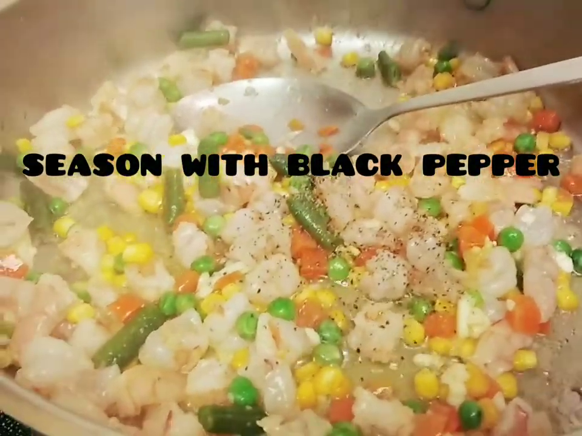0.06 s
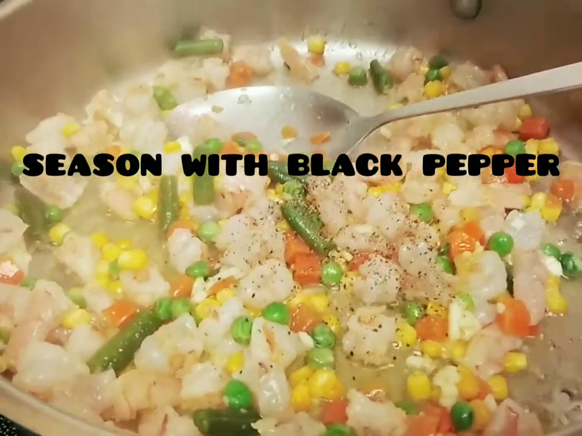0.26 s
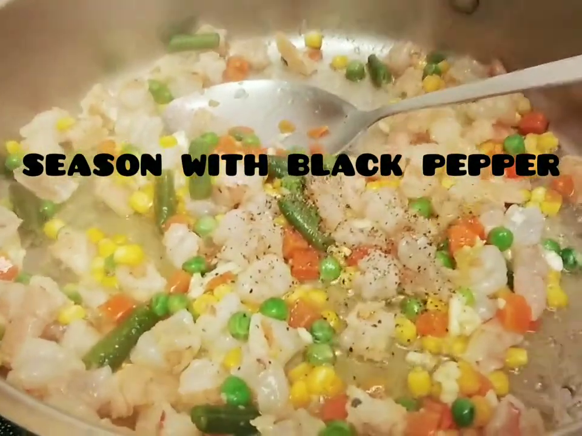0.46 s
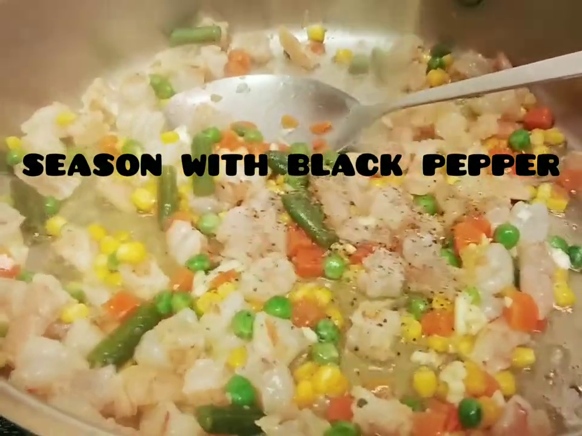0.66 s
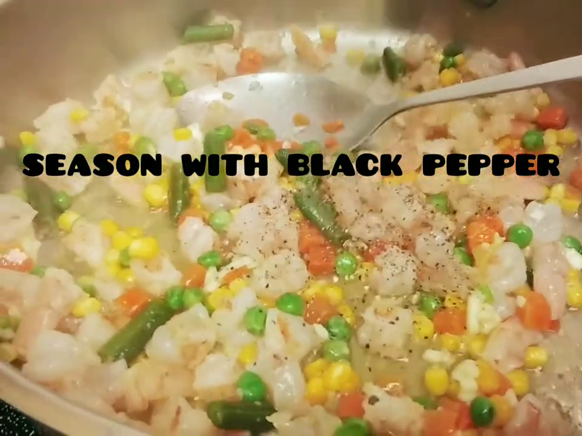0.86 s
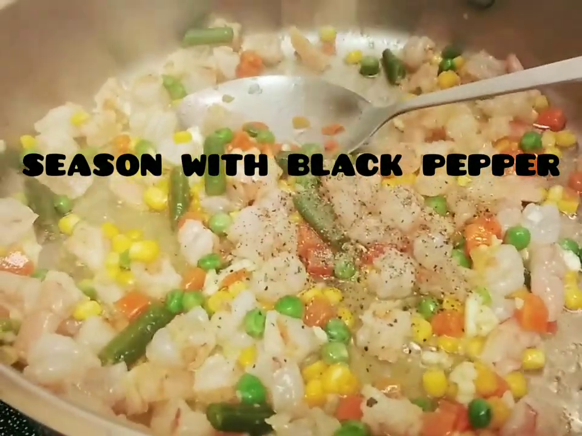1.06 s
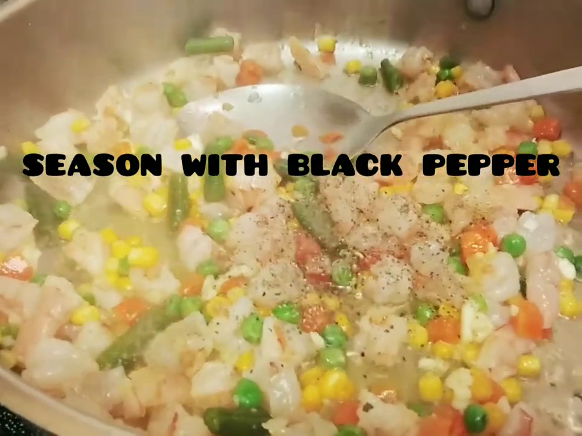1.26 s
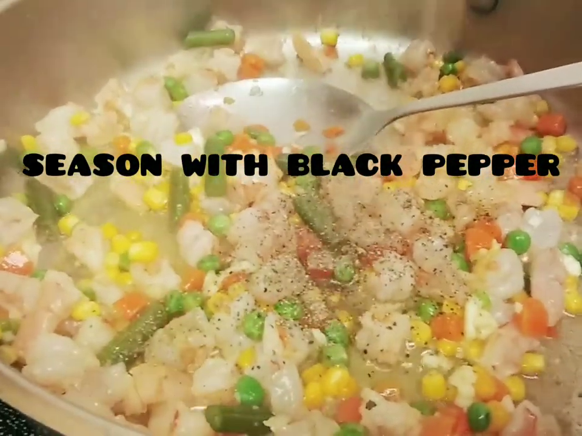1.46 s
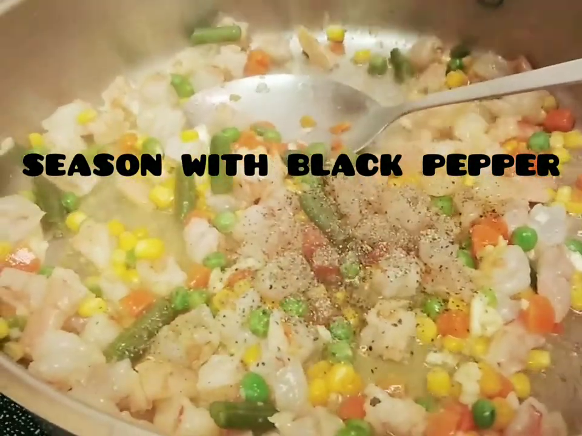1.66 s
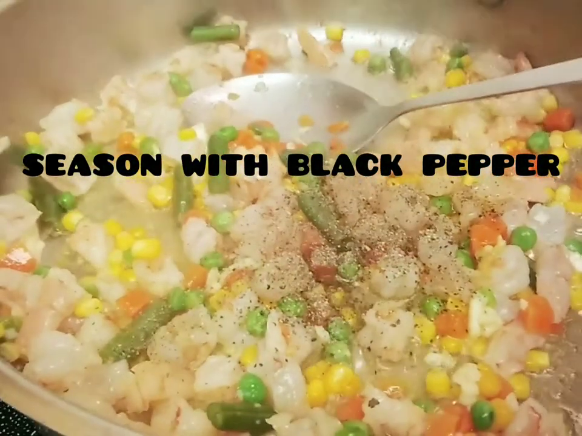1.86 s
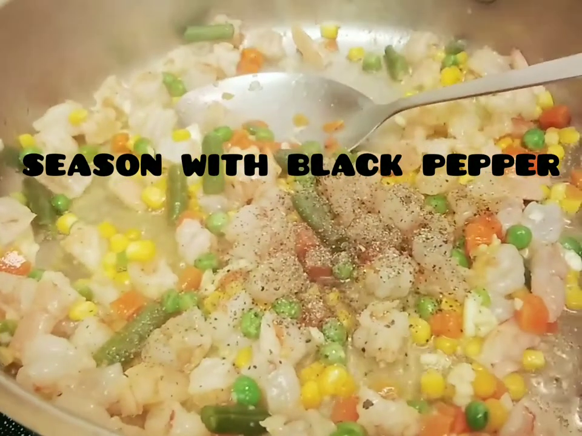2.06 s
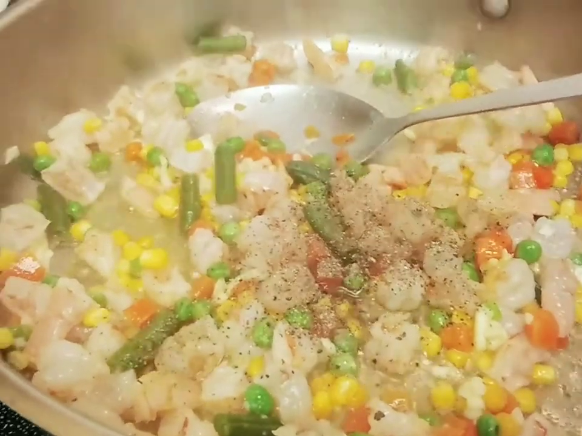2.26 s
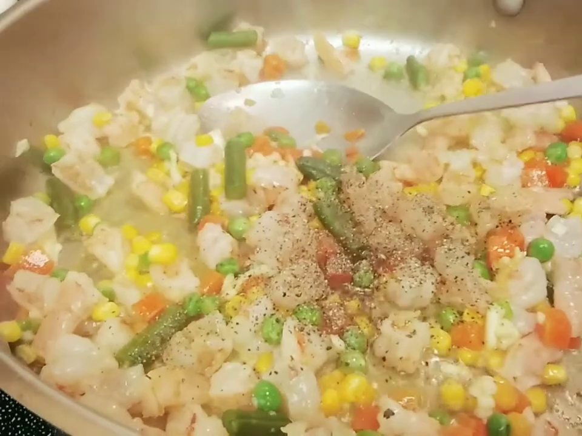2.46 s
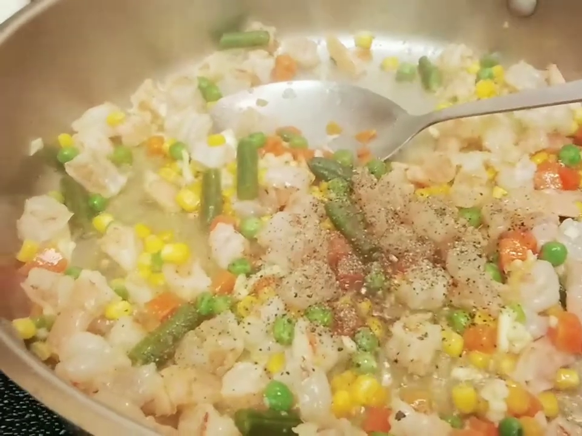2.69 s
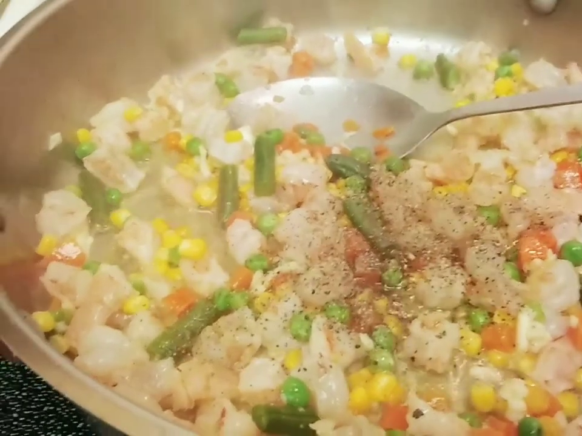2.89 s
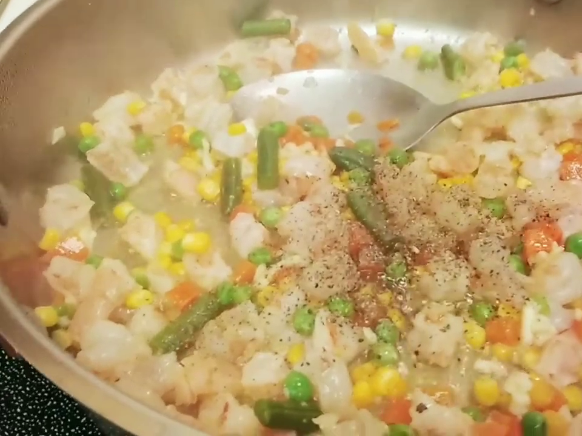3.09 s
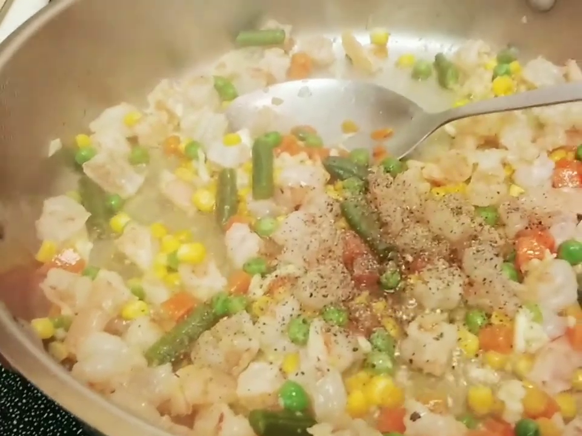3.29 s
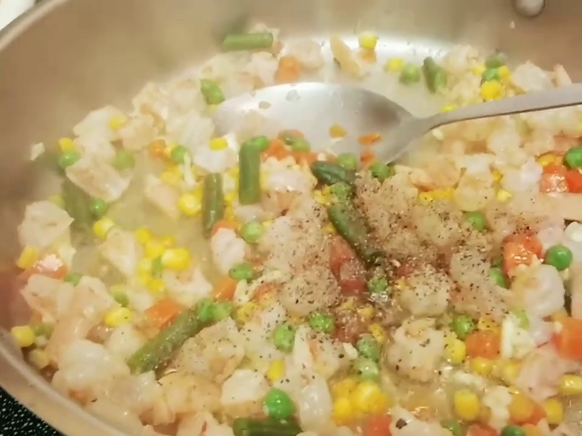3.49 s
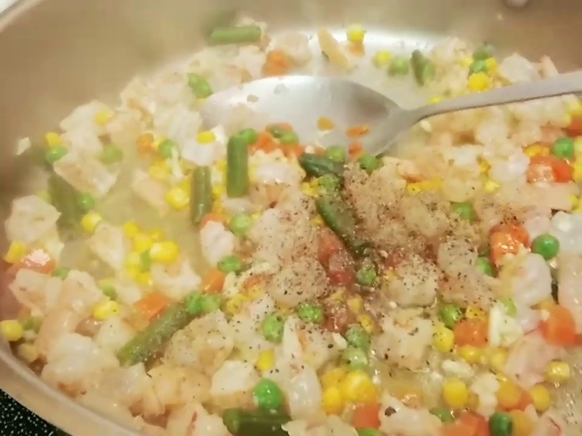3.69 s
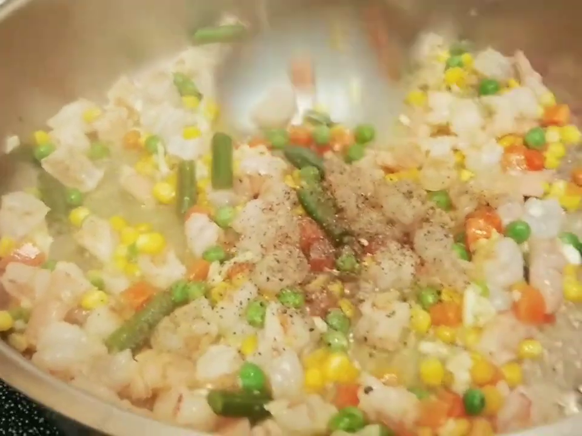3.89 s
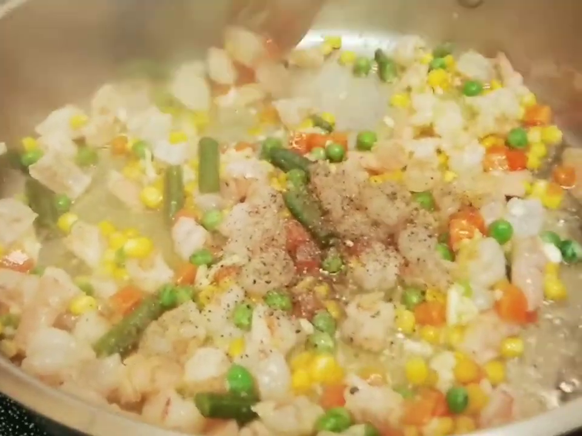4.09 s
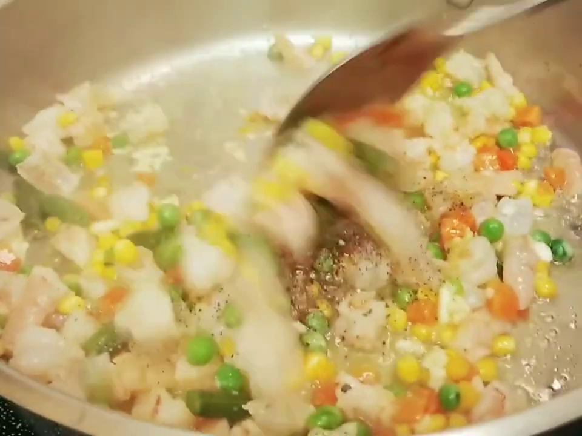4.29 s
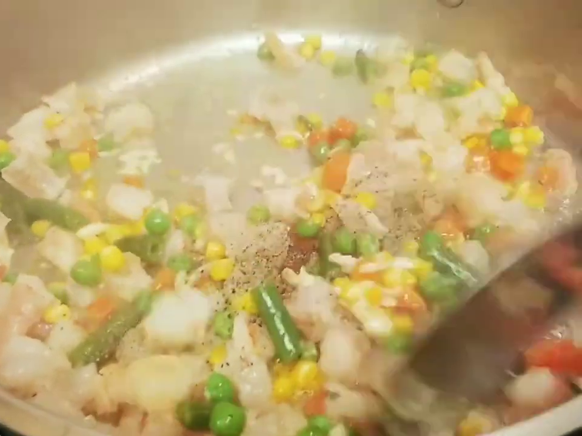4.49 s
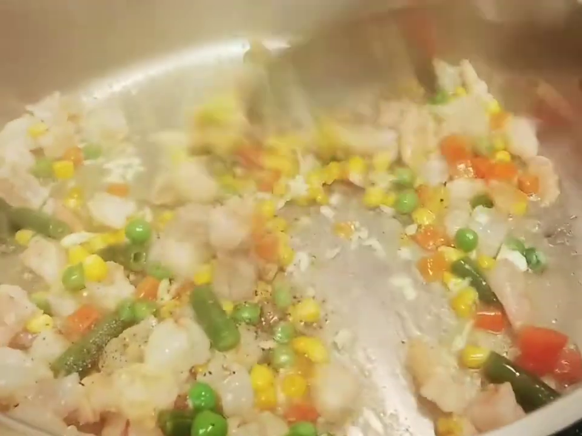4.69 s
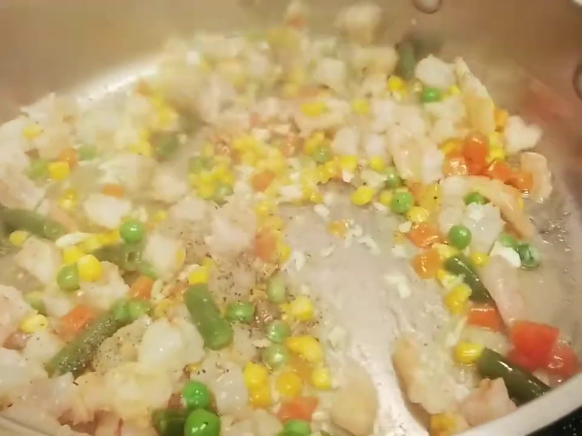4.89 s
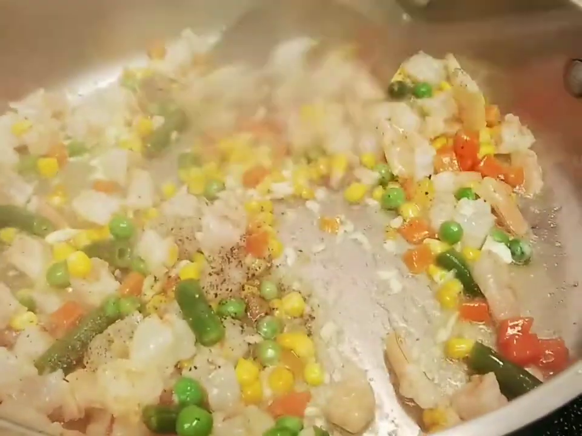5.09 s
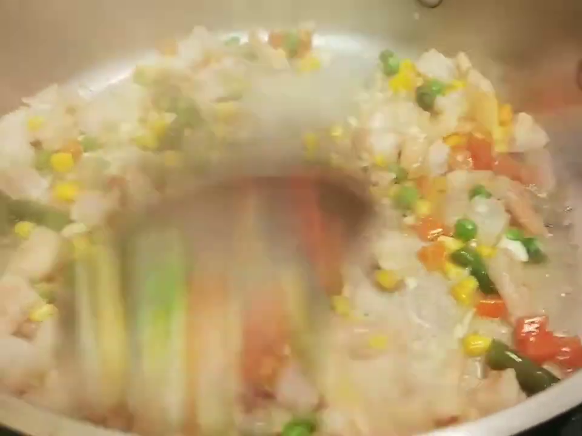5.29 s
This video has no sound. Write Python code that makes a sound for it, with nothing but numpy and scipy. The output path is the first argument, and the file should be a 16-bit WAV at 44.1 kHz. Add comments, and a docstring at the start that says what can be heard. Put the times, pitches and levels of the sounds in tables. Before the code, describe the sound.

A close, steady, bright sizzle runs throughout as shrimp and vegetables fry in oil in a steel pan in a kitchen. Tiny pops and faint spurts of steam dot the hiss, with sharp spits of oil at about 1.7 and 3.4 seconds. Between 2.7 and 2.9 seconds, something is set down on the worktop with a few dull thuds. At 3.7 seconds a metal spoon is picked up, clinking lightly and sliding over the steel with a thin, high rasp. At 4.2 seconds it skids into the pan with a sharp, briefly ringing clang, the loudest sound. Two lower metallic knocks on the pan's bottom follow at about 4.6 and 4.7 seconds. The spoon scrapes on through softly squelching food while the sizzle grows slightly and flares, with a short spurt of steam at around 5.2 seconds.

```python
"""A close, steady sizzle: shrimp and vegetables fry in oil in a steel pan in a kitchen. Tiny steam
bubbles burst by the thousand, coloured by the air between the pan's walls. Something is set down on the
worktop with a few dull thuds. Then a metal spoon is picked up, clangs against the pan and knocks on its
bottom, exciting the steel's modes, and scrapes through the wet food while the sizzle grows."""
import sys
import numpy as np
from scipy import signal
from scipy.fft import rfft, irfft, next_fast_len
from scipy.io import wavfile
from scipy.ndimage import map_coordinates

SR = 44100
rng = np.random.default_rng(int(sys.argv[2]) if len(sys.argv) > 2 else 0)


def master_out(mix):
    """Clip the mix to full scale and print it as 16-bit PCM to the path in sys.argv[1]."""
    frames = np.transpose(np.atleast_2d(mix))
    ceiling = np.clip(frames, -1, 1)
    pcm = np.round(ceiling * 32767).astype(np.int16)
    wavfile.write(sys.argv[1], SR, pcm)


N = 235701
TIME = np.arange(N) / SR
CUTOFF_HZ = 15850


def from_db(db):
    """Decibels to amplitude ratio."""
    return 10 ** (np.asarray(db) / 20)

def rms_one(x):
    """Normalisation to unit rms."""
    return x / np.sqrt(np.mean(x ** 2) + 1e-20)

def add(track, start_s, sound):
    """Superposition: a sound adds to the track from its start on."""
    at = max(0, round(start_s * SR))
    track[at:at + len(sound)] += sound[:N - at]

def filtered(x, gain_at):
    """Linear filtering: the spectrum is multiplied by gain_at(Hz)."""
    size = next_fast_len(len(x))
    hz = np.maximum(np.fft.rfftfreq(size, 1 / SR), 1)
    return irfft(rfft(x, size) * gain_at(hz), size)[:len(x)]

def spectrum(points):
    """Spectral envelope through (Hz, dB) points, interpolated in log frequency."""
    at, db = np.transpose(points)
    return lambda hz: from_db(np.interp(np.log(hz), np.log(at), db))

def band(low_hz, high_hz, low_order, high_order):
    """Band-pass response: each skirt falls 6 dB per octave per order."""
    return lambda hz: ((1 + (low_hz / hz) ** (2 * low_order))
                       * (1 + (hz / high_hz) ** (2 * high_order))) ** -.5

def resonances(modes, width_hz, valley_db):
    """Modal response: one peak per mode, wider in the treble, summed in power over a flat floor."""
    grid = np.arange(0, SR / 2, 10)
    power = sum(from_db(db) ** 2 / (1 + ((grid - hz) / (width_hz + 0.003 * hz)) ** 2) ** 2
                for hz, db, *_ in modes)
    return lambda hz: np.interp(hz, grid, np.sqrt(power + from_db(valley_db) ** 2))

def drift(rate_hz):
    """Random modulation: low-passed noise of unit rms."""
    return rms_one(filtered(rng.standard_normal(N), lambda hz: 1 / (1 + (hz / rate_hz) ** 2)))

def grains(per_s, spread_db):
    """Shot noise: independent impulses of random size and sign."""
    sizes = from_db(spread_db * np.minimum(rng.exponential(1, N), 6)) * rng.choice([-1, 1], N)
    return sizes * (rng.random(N) < per_s / SR)


# Spectrum of the stove and kitchen. Each row: frequency in Hz, relative density in dB.
ROOM_SPECTRUM = [(20, -29), (40, -23), (60, 14), (85, -3), (120, 11), (180, -32), (400, -11), (900, -25)]
def rumble(level_db, waver_db):
    """Ambient noise: a faint low floor whose level wavers."""
    level = from_db(level_db + waver_db * drift(rate_hz=2.3))
    return level * rms_one(filtered(rng.standard_normal(N), spectrum(ROOM_SPECTRUM)))

# Path of a faint band in the sizzle. Each row: time in seconds, centre in Hz, level in dB.
GLIDE_PATH = [(1.9, 2487, -100), (2.17, 2640, -56), (2.45, 3026, -59.5), (2.72, 3690, -63),
              (2.98, 3340, -69), (3.11, 2660, -61), (3.35, 2285, -83)]
def gliding_band(width_hz):
    """Narrow-band noise: a randomly modulated carrier glides up in pitch and back down."""
    times, centres, levels = np.transpose(GLIDE_PATH)
    phase = 2 * np.pi * np.cumsum(np.interp(TIME, times, centres)) / SR
    level = from_db(np.interp(TIME, times, levels))
    return level * (drift(width_hz) * np.cos(phase) + drift(width_hz) * np.sin(phase))

# Modes of the air between the pan's high walls. Each row: frequency in Hz, relative level in dB.
AIR_MODES = [(590, -5), (1130, 3), (1500, 4), (1630, 2), (1950, 3.5), (2320, 3), (2720, -1), (2950, -1),
             (3300, 1.5), (3600, 0.5)]
def simmer(level_db, patchy_db):
    """Cavity resonance: juice bubbles in patches that come and go, each exciting one air mode."""
    patches = np.zeros(N)
    for mode in AIR_MODES:
        bubbles = grains(per_s=800, spread_db=4.5)
        patch = filtered(bubbles, resonances([mode], width_hz=53, valley_db=-41))
        patches += patch * from_db(patchy_db * drift(rate_hz=2.7))
    return from_db(level_db) * rms_one(patches)

# Spectrum of bursting bubbles. Each row: frequency in Hz, relative density in dB.
BUBBLE_SPECTRUM = [(150, -19), (400, -10.5), (900, -13), (1500, -14), (2500, -10), (3600, -6.5),
                   (4700, -5.5), (5400, -2.5), (7000, 0.5), (8500, 3), (10200, -2.5), (12500, -8.5),
                   (15800, -11)]
def sizzle(level_db, flutter_db, stir_s, growth_db_per_s):
    """Shot noise of bursting steam bubbles; it grows once stirring brings wet food onto hot steel."""
    bursts = grains(per_s=14000, spread_db=2.0) * from_db(flutter_db * drift(rate_hz=12.0))
    cavity = resonances(AIR_MODES, width_hz=72, valley_db=-1.0)
    hiss = filtered(bursts, lambda hz: spectrum(BUBBLE_SPECTRUM)(hz) * cavity(hz))
    return rms_one(hiss) * from_db(level_db + growth_db_per_s * np.maximum(TIME - stir_s, 0))

def crackle(level_db, spread_db, ring_s):
    """Damped resonance: larger bubbles pop out of the hiss, each size at its own pitch."""
    out, t = np.zeros(N), TIME[:SR // 50]
    for hz in np.geomspace(2200, 11000, 7):
        pop = filtered(rng.standard_normal(len(t)), band(hz / 1.25, hz * 1.25, 4, 4))
        pop *= np.exp(-t / ring_s)
        pops = signal.fftconvolve(grains(per_s=14, spread_db=spread_db), pop / np.linalg.norm(pop))
        out += pops[:N] * spectrum(BUBBLE_SPECTRUM)(hz) ** .5
    return from_db(level_db) * rms_one(out)

# Strokes that lay wet food on bare hot steel. Each row: start in seconds, level in dB.
WETTINGS = [(3.76, -46), (4.3, -47), (4.6, -48), (5.08, -43.5)]
def flares(low_hz, high_hz, rise_s, fade_db_per_s):
    """Flash boiling: fresh moisture fizzes in very fine bubbles, then dries off."""
    power = np.zeros(N)
    for start, db in WETTINGS:
        age = np.maximum(TIME - start, 0)
        power += (np.minimum(age / rise_s, 1) * from_db(db - fade_db_per_s * age)) ** 2
    fizz = filtered(grains(per_s=7400, spread_db=2.5), band(low_hz, high_hz, 2.7, 3.1))
    return np.sqrt(power) * rms_one(fizz)

# Sharp ticks. Each row: start in seconds, peak in dB, lower corner in Hz, 60 dB decay time in seconds.
SHARP_TICKS = [(1.742, -25, 1370, 0.017), (1.742, -30, 11000, .05), (1.748, -33, 1960, 0.14),
               (3.382, -23, 5900, 0.016), (3.856, -22, 4500, 0.0081), (4.614, -25.5, 8000, 0.077)]
def ticks():
    """Impulsive sources: spits of oil and, at 4.614 s, the bright click of the spoon hitting the pan."""
    out, t = np.zeros(N), TIME[:SR // 20]
    for start, db, low_hz, t60 in SHARP_TICKS:
        tick = filtered(rng.standard_normal(len(t)), band(low_hz, 11700, 5.3, 4.7))
        tick *= from_db(-60 * t / t60)
        add(out, start, from_db(db) * tick / np.abs(tick).max())
    return out

# Modes of the steel pan with food in it. Each row: frequency in Hz, relative level in dB,
# 60 dB decay time in seconds.
STEEL_MODES = [(114, -1, .24), (255, -5, .1), (310, 2, .14), (436, -1, .15), (505, -5, .12),
               (579, -1.5, .15), (775, -1.5, .12), (921, -1, .22), (1105, -5, .13), (1185, -5, .2),
               (1300, -6, .12), (1410, -2, .2), (1465, -3, .15), (1520, -1, .13), (1955, -5, .11),
               (2235, -5, .15), (2422, -5, .14), (2505, -5, .13), (2568, -3, .09), (2725, -6, .17),
               (3170, -6, .12), (3555, -4, .17), (3635, 3, .07), (3978, 1, .16), (4365, -4, .11),
               (4750, -3, .12), (5136, -3, .08), (5600, -4, .14), (6350, -4, .12), (6790, -2, .22),
               (7106, -1, .2), (7300, -2, .22), (8130, -2, .13), (8480, 2, .17), (9710, 1, .17),
               (10080, -1, .16), (10950, -1, .13), (11476, 1, .11), (13920, -3, .2), (15040, -4, .2)]
def pan_rush(rows, octaves, swell_share, low_order, high_order, fade_db, grit_db, glide_octaves=0):
    """Forced vibration: a rush of tiny bursts or slips drives the pan, swelling and then fading."""
    out, t = np.zeros(N), TIME[:SR // 2]
    impulses = grains(per_s=5400, spread_db=1.0)
    steel = resonances([mode for mode in STEEL_MODES if mode[0] < 8000], width_hz=6.2, valley_db=-1)
    edge_ratio = 2 ** (octaves / 2)
    roughness = rms_one(from_db(grit_db * drift(rate_hz=80)))
    for start, length, db, centre_hz in rows:
        force = np.roll(impulses, rng.integers(N))[:len(t)]
        passband = band(centre_hz / edge_ratio, centre_hz * edge_ratio, low_order, high_order)
        rush = rms_one(filtered(force, lambda hz: passband(hz) * steel(hz)))
        progress = t / length
        speed = 2 ** (glide_octaves * (np.minimum(progress, 1) - swell_share))
        rush = map_coordinates(rush, [np.cumsum(speed)], order=5, mode="mirror")  # pitch follows speed
        swell = np.minimum(progress / swell_share, 1)
        fade = from_db(fade_db * np.maximum(progress - swell_share, 0) ** 1.86)
        add(out, start, from_db(db) * swell * fade * rush)
    return out * roughness

# Spurts of steam. Each row: start and length in seconds, level in dB, band centre in Hz.
STEAM_SPURTS = [(.39, 0.083, -52, 1970), (.42, 0.08, -46, 5570), (.603, 0.085, -42, 5360),
                (.612, 0.062, -45, 6930), (1.43, 0.1, -46.5, 5700), (1.746, 0.039, -46, 2350),
                (3.185, 0.045, -53.5, 2050), (5.21, 0.15, -31.5, 8300)]
def steam():
    """Flow noise: steam escapes from under the food in a narrow band that rises in pitch."""
    return pan_rush(STEAM_SPURTS, octaves=0.19, swell_share=0.22, low_order=14, high_order=20,
                    fade_db=-47, grit_db=3.5, glide_octaves=.2)

# Pushes through the food. Each row: start and length in seconds, level in dB, band centre in Hz.
FOOD_PUSHES = [(3.8, 0.3, -44, 1500), (4.36, 0.19, -47, 2700), (4.63, 0.27, -36, 2120),
               (5.01, 0.32, -42.5, 2480), (5.068, 0.087, -48.5, 643)]
def squelches():
    """Broadband shot noise: wet food squelches as it is pushed through the pan."""
    return pan_rush(FOOD_PUSHES, octaves=2.44, swell_share=0.088, low_order=4.1, high_order=1.8,
                    fade_db=-37, grit_db=1)

# Slides of the spoon. Each row: start and length in seconds, level in dB, band centre in Hz.
SPOON_SLIDES = [(3.719, 0.27, -35.5, 6900), (3.785, 0.17, -30.5, 6950), (3.98, 0.16, -41, 6670),
                (4.245, 0.16, -28, 7000), (4.275, 0.15, -34, 5820), (4.61, 0.2, -27.5, 7130),
                (5.012, 0.21, -42.5, 5400), (5.19, 0.23, -41, 6900)]
def slides():
    """Stick-slip friction: the spoon slides over the steel with a thin, high rasp."""
    return pan_rush(SPOON_SLIDES, octaves=0.27, swell_share=0.021, low_order=7.3, high_order=110,
                    fade_db=-46.0, grit_db=1.3)

# Catches of the spoon's edge. Each row: start and length in seconds, level in dB, band centre in Hz.
EDGE_CATCHES = [(3.8068, 0.011, -31, 5500), (3.8185, .016, -34, 7500), (3.8445, 0.011, -36, 6500),
                (3.860, .04, -36, 3800), (3.8748, 0.02, -30, 5750), (3.890, 0.071, -37, 5760),
                (4.294, .02, -28, 5800)]
def catches():
    """Stick-slip in brief bursts: the edge catches and jumps on the steel."""
    return pan_rush(EDGE_CATCHES, octaves=0.2, swell_share=0.037, low_order=15, high_order=5,
                    fade_db=-51, grit_db=1.0)

# The spoon's skid. Each row: start and length in seconds, level in dB, band centre in Hz.
SPOON_SKID = [(4.205, 0.19, -20.5, 1700)]
def skid():
    """Broadband friction noise: the spoon skids into the loud clang and on along the steel."""
    return pan_rush(SPOON_SKID, octaves=9.1, swell_share=0.085, low_order=5.6, high_order=0.27,
                    fade_db=-61, grit_db=0.0)

def struck_at(modes, favoured_hz, boost_db=9):
    """Mode shapes: a blow favours the modes that swing most at the spot struck."""
    excited = np.array(modes, float)
    for hz in favoured_hz:
        excited[np.argmin(np.abs(excited[:, 0] - hz)), 1] += boost_db
    return excited

def impacts(rows, modes, rise_cycles, low_order, width_hz, valley_db,
            tail_db, tail_t60, boom_db, boom_t60):
    """Impulse response: a crack, a dense crash, clear modes and the room's tail, longest in the bass."""
    out, t = np.zeros(N), TIME[:SR * 3 // 4]
    shortest_rise_s, crack_s = 0.00096, 0.005
    bass = band(50, 132, 3.6, 3.8)
    for start, db, low_hz, high_hz, high_order, t60, crack_db, ring_db, favoured_hz in rows:
        excited = struck_at(modes, favoured_hz)
        mode_hz, mode_db, mode_t60 = excited.T[:, :, None]
        body = resonances(excited, width_hz, valley_db)
        contact = band(low_hz, high_hz, low_order, high_order)
        dense, room, boom = (filtered(rng.standard_normal(len(t)), lambda hz: contact(hz) * colour(hz))
                             for colour in (body, body, bass))
        crack = from_db(crack_db) * np.exp(-(t / crack_s) ** 2)
        crash = dense * (crack + from_db(-60 * t / t60))
        crash += room * from_db(tail_db - 60 * t / tail_t60)
        crash += boom * from_db(boom_db - 60 * t / boom_t60)
        strength = contact(mode_hz) * from_db(mode_db + rng.normal(0, 2.0, mode_hz.shape))
        waves = np.sin(2 * np.pi * (mode_hz * t + rng.random(mode_hz.shape)))
        ring = np.sum(strength * waves * from_db(-60 * t / mode_t60), axis=0)
        rise_s = shortest_rise_s + rise_cycles / high_hz  # a cushioned contact is duller and slower
        blow = (rms_one(crash) + from_db(ring_db) * rms_one(ring)) * np.minimum(t / rise_s, 1)
        equivalent_rms = np.sqrt(np.sum(blow ** 2) / (SR / 50))  # as if all its energy lay in 20 ms
        add(out, start, from_db(db) * blow / equivalent_rms)
    return out

# Modes of the worktop. Each row: frequency in Hz, relative level in dB, 60 dB decay time in seconds.
WORKTOP_MODES = [(65, -7, 0.72), (105.7, -1.5, 0.16), (239.6, 0, 0.062), (343, -0.5, 0.016),
                 (517, 5, 0.059), (620, -4.5, 0.1), (743, 1.5, 0.059), (1076, -5, 0.18), (1153, 1, 0.078),
                 (1570, -12, 0.43)]
# Soft blows. Each row: start in seconds, level in dB, lower and upper corners in Hz,
# 60 dB decay time of the crash in seconds.
SOFT_BLOWS = [(0.623, -51, 100, 407, 0.19), (0.727, -56.5, 75, 220, 0.062), (0.784, -57.5, 198, 730, 0.12),
              (0.868, -58, 60, 137, 0.14), (0.961, -57, 55, 129, 0.087), (1.283, -54, 140, 450, 0.9),
              (1.74, -54, 197, 450, 0.23), (2.2335, -40, 656, 740, 0.05), (2.25, -48.5, 650, 860, 0.6),
              (2.7322, -20.5, 140, 382, 0.066), (2.7361, -31, 690, 2850, 0.052),
              (2.744, -30.5, 220, 1020, 0.13), (2.811, -43.5, 1100, 1280, 0.017),
              (2.8483, -32.5, 170, 264, 0.013), (2.855, -52, 1060, 1300, .02),
              (2.903, -28.5, 183, 292, 0.057), (2.906, -49.5, 1110, 1900, 0.12),
              (2.92, -43.5, 385, 606, 0.055), (3.73, -42, 95, 127, 0.34), (3.841, -37.5, 106, 149, 0.44),
              (4.416, -52.5, 54.5, 95, 0.51), (4.465, -61, 55, 95, 0.24), (4.675, -29.5, 87, 124, 0.45)]
def thuds():
    """Soft contact excites mainly low modes: thuds on the worktop, and the pan rocking on the stove."""
    high_order, crack_db, ring_db = 4.37, -12.5, -3.5
    rows = [(start, db, low_hz, high_hz, high_order, t60, crack_db, ring_db, [])
            for start, db, low_hz, high_hz, t60 in SOFT_BLOWS]
    return impacts(rows, WORKTOP_MODES, rise_cycles=1.1, low_order=3.75, width_hz=63, valley_db=-5.0,
                   tail_db=1.0, tail_t60=0.14, boom_db=-35, boom_t60=0.24)

# Blows of the spoon; the faint row at 4.607 s is a soft swell into the next knock. Each row: start in
# seconds, level in dB, lower and upper corners in Hz, order of the upper slope, 60 dB decay time of
# the crash in seconds, relative crack and ring levels in dB, favoured modes in Hz.
SPOON_BLOWS = [(3.7235, -30.5, 370, 610, 1.1, 0.62, -20, 0.5, [436, 505, 775, 3978]),
               (3.7778, -24, 392, 2000, 1.3, 0.095, -3, -4.5, [505, 775, 1105, 1300, 1410, 2568, 3635]),
               (3.948, -47.5, 450, 700, 3.3, 0.054, -7, -12, [579]),
               (3.9803, -35.5, 450, 4800, 4, 0.18, 4, -12, [775, 3170, 5136]),
               (3.991, -43, 1200, 2060, 1.9, 0.093, -17, -15, [1465, 1955]),
               (4.2262, -12, 110, 15100, 5.8, 0.066, 5, -5.5, [579, 1105, 1185, 3555, 3635, 3978, 4365, 4750]),
               (4.2312, -16, 3800, 15100, 8, 0.074, 16, -2.5, [3635, 5136, 8130, 9710, 11476]),
               (4.607, -35, 200, 1500, 1.5, 0.11, -8, -4, []),
               (4.6145, -15, 199, 870, 1.5, 0.14, -9, 3, [310, 436, 579, 921, 1410, 1465]),
               (4.638, -26, 500, 2540, 3.1, 0.08, -15, -8, [921, 1410, 1520, 2505]),
               (4.6826, -13, 297, 2700, 4.9, 0.093, -1.5, -9.5, [436, 775, 1105, 1520, 1955, 2235, 2505]),
               (4.7595, -37.5, 300, 900, 2.9, 0.033, -1, -8, []),
               (4.7725, -31.5, 314, 620, 5, 0.05, 1, -17, [436]),
               (4.791, -44, 704, 1800, 1.9, 0.2, -10, -15, [1185])]
def clangs():
    """Free vibration: struck by the spoon, the pan rings in its inharmonic modes."""
    return impacts(SPOON_BLOWS, STEEL_MODES, rise_cycles=2.2, low_order=0.74, width_hz=27, valley_db=-3,
                   tail_db=-9, tail_t60=0.2, boom_db=2, boom_t60=0.4)

def widening(x, at_s, half_width_s, level_db, delay_s, low_hz):
    """Decorrelation: a delayed copy of the treble, used as a side signal, briefly widens the image."""
    delayed = np.interp(TIME - delay_s, TIME, x)
    treble = filtered(delayed, band(low_hz, CUTOFF_HZ, 14, 14))
    return from_db(level_db) * treble * np.exp(-((TIME - at_s) / half_width_s) ** 2)


def scene():
    """Mid-side stereo: all sources add in the centre, and only the loudest clang spreads out."""
    frying = sizzle(level_db=-43.6, flutter_db=1.1, stir_s=4.15, growth_db_per_s=2)
    frying += simmer(level_db=-64.5, patchy_db=6.0)
    frying += crackle(level_db=-59, spread_db=-0.2, ring_s=0.0016)
    frying += gliding_band(width_hz=240)
    frying += flares(low_hz=9000, high_hz=13900, rise_s=0.062, fade_db_per_s=15)
    bursts = ticks() + steam()
    spoon = clangs()
    handling = thuds() + slides() + catches() + skid() + squelches()
    middle = frying + bursts + spoon + handling + rumble(level_db=-74.0, waver_db=1.5)
    side = widening(spoon, at_s=4.23, half_width_s=.011, level_db=-13, delay_s=.0012, low_hz=4600)
    return np.array([middle + side, middle - side])

def record(dry):
    """Hard clipping flattens the highest peaks, and a steep low-pass cuts the top."""
    low_pass = signal.ellip(12, .1, 90, CUTOFF_HZ, fs=SR, output="sos")
    return signal.sosfilt(low_pass, np.clip(dry, -.7, .7))


dry = scene()
out = record(dry)
master_out(out)
```